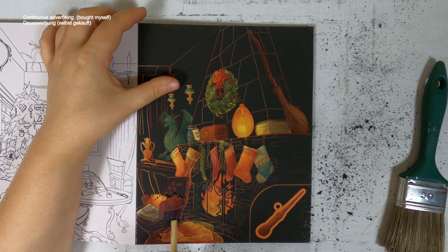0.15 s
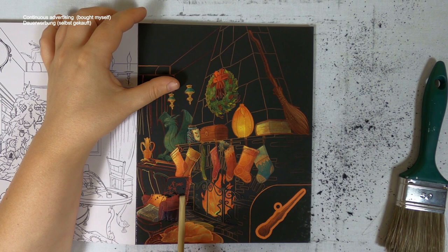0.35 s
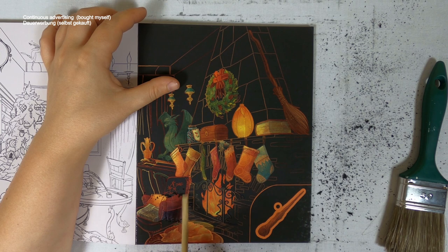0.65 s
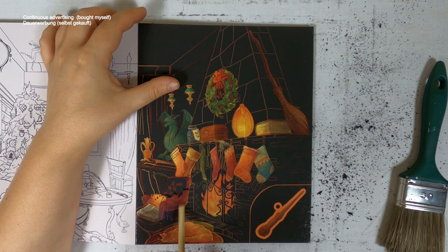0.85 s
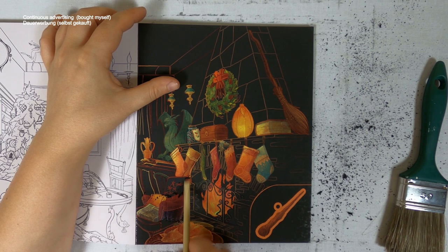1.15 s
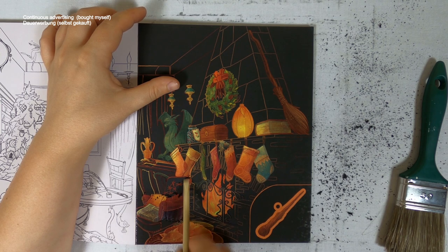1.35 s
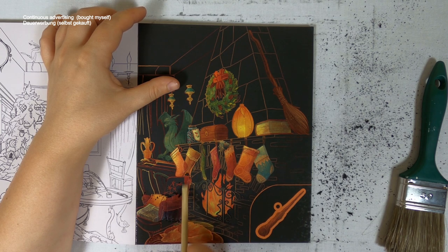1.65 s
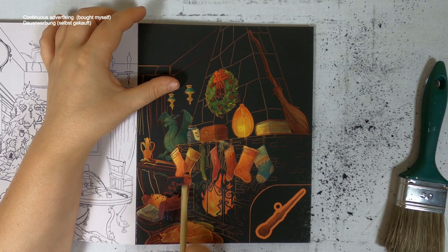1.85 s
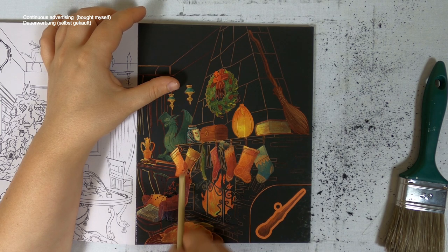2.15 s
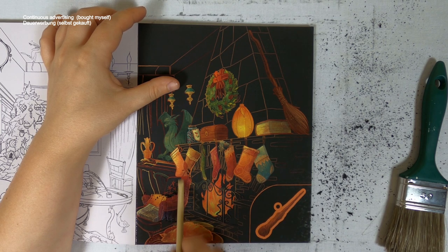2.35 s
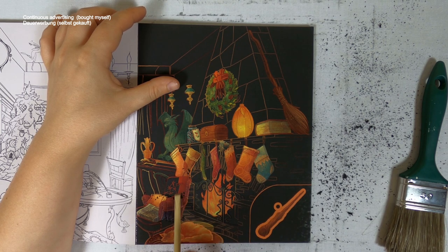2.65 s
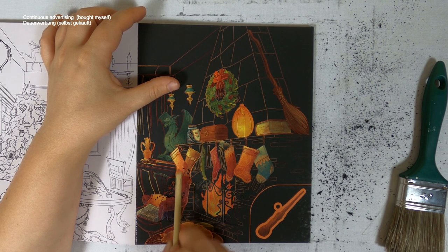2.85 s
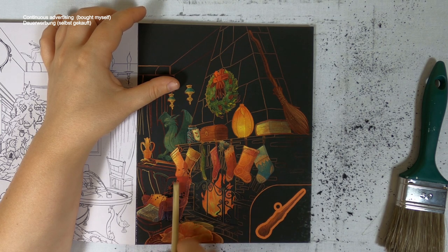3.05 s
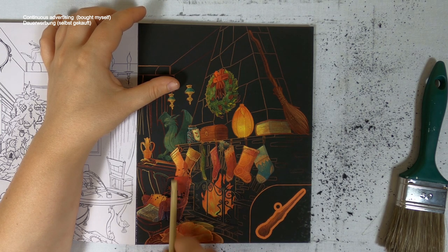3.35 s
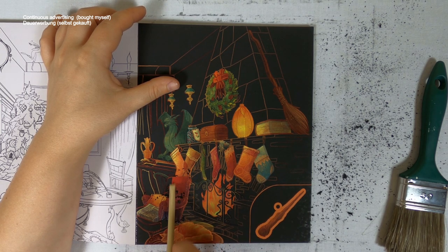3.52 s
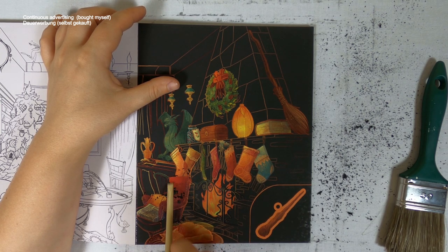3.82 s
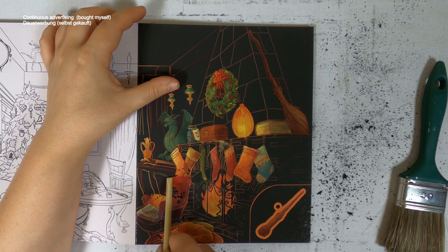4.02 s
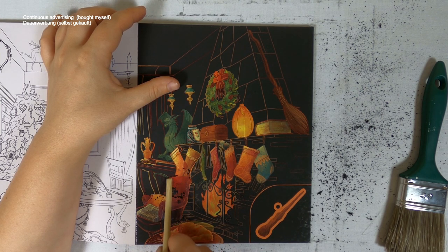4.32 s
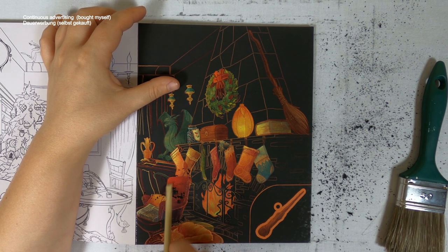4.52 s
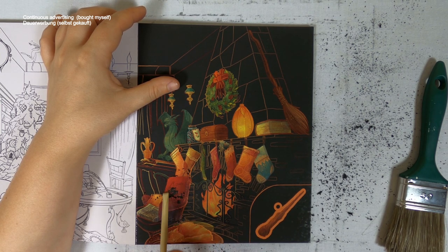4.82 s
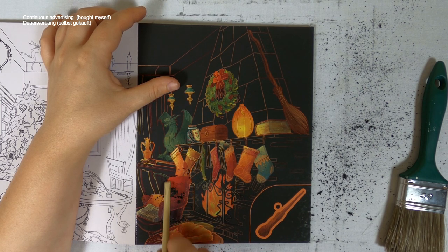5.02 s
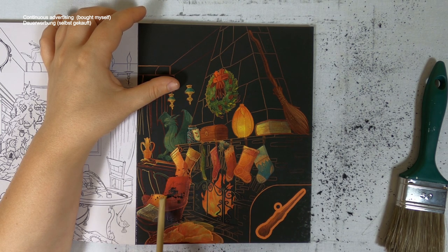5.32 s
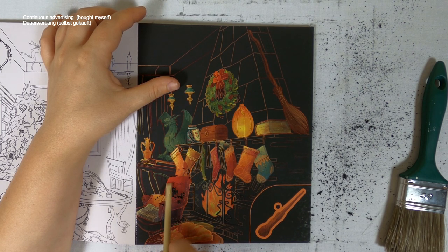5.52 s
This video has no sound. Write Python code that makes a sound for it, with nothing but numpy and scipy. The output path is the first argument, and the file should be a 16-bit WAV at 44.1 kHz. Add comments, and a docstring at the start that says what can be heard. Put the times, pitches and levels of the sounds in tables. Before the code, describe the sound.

In a quiet room, a pointed wooden stylus scrapes rapidly back and forth on coated scratch paper, heard closely in stereo. It starts abruptly at 0 s with a firm catch and the clearest soft table bump. Short strokes follow every 0.05 to 0.2 s, unevenly accented, each a grainy stick-slip chatter around 600-1000 Hz, often gliding down. Brief woody chirps stand out near 0.35, 1.1, 2.45, 2.65 and 2.8 s. Crisp hiss of crumbling coating is strongest in the first 0.8 s; small flakes snap around 0.3, 2.1-2.5 and 5.55 s. From 2.6 to 3.9 s the scraping is dense and steady. After about 3.2 s pitch is lower, and from 4 to 5.5 s strokes are softer and more spaced, with one last catch and flakes near 5.55 s. Faint low table shaking, occasional dull bumps, short reverberation and barely audible room noise lie underneath.

```python
"""Quick to-and-fro scraping: a pointed wooden stylus on a sheet of scratch paper on a table, in a quiet room.
Strokes and catches: stick-slip grains and gliding chirps ring the board; most strokes fall in pitch.
The coating crumbles as coloured grain noise, and flakes snap off as short noise bursts.
The hand shakes, rocks and bumps the table (low filtered noise, damped sines).
A short reverberation and faint steady room noise surround it."""
import sys
import numpy as np
from scipy import signal
from scipy.fft import rfft, irfft, next_fast_len
from scipy.io import wavfile
from scipy.ndimage import uniform_filter1d, map_coordinates

SR = 44100
rng = np.random.default_rng(int(sys.argv[2]) if len(sys.argv) > 2 else 0)


def dump(signal):
    """Clip the signal to [-1, 1] and save it as 16-bit WAV at the path in sys.argv[1]."""
    limited = np.clip(np.atleast_2d(signal).T, -1, 1)
    pcm = np.round(limited * 32767).astype(np.int16)
    wavfile.write(sys.argv[1], SR, pcm)


N = 250047


def amp(db):
    """Decibels to gain."""
    return 10 ** (np.asarray(db) / 20)


def unit(x):
    """x at rms 1."""
    return x / np.sqrt(np.mean(x ** 2) + 1e-20)


def along(points, hz):
    """(frequency [Hz], value) points read on a log axis."""
    f, v = np.transpose(points)
    return np.interp(np.log(hz + 1), np.log(f + 1), v)


def at_time(points, s):
    """(time [s], value) points joined by straight lines."""
    return np.interp(s, *np.transpose(points))


def wobble(rate_hz):
    """Smooth random curve with rate_hz knots a second."""
    knots = rng.standard_normal(int(N * rate_hz / SR) + 4)
    return map_coordinates(knots, [np.arange(N) * rate_hz / SR])


def filtered(x, response):
    """x times a response of frequency."""
    size = next_fast_len(N + SR // 2)
    return irfft(rfft(x, size) * response(np.fft.rfftfreq(size, 1 / SR)), size)[..., :N]


def ringing(x, gain_db, size=16384):
    """x through a causal minimum-phase filter with the given dB response, so that its peaks ring on."""
    cepstrum = irfft(np.log(amp(gain_db(np.fft.rfftfreq(size, 1 / SR)))))
    cepstrum[1:size // 2] *= 2
    cepstrum[size // 2 + 1:] = 0
    impulse = irfft(np.exp(rfft(cepstrum)))
    return signal.fftconvolve(x, impulse[None], axes=1)[:, :N]


def stereo(pair, alike):
    """Two unrelated signals mixed to left and right with a given coherence."""
    def mid_side(hz):
        turn = np.arccos(np.clip(along(alike, hz), -1, 1)) / 2
        return np.array([np.cos(turn), np.sin(turn)])
    mid, side = filtered(pair, mid_side)
    return np.array([mid + side, mid - side])


# tip strokes: (time of full grip [s], rise [s], drag [s], level [dB], pitch fall [octaves])
STROKES = [(0.0, .03, 0.0087, -37.5, 0.39), (0.151, 0.066, 0.026, -43.5, 0.018),
           (0.29, .021, 0.035, -38.5, 0.21), (0.345, 0.042, 0.031, -32.5, 1.06),
           (0.535, 0.022, 0.018, -44.5, 0.96), (0.69, 0.11, 0.041, -49.5, 0),
           (0.752, .014, 0.0088, -35, 1.25), (0.869, 0.051, .01, -47.5, 0.15),
           (1.039, 0.064, 0.034, -54, 0.22), (1.093, 0.017, 0.042, -35.5, 0.96),
           (1.223, 0.029, 0.07, -61, 0), (1.403, 0.065, 0.047, -52.5, 0.25), (1.458, .04, .014, -36, 0.68),
           (1.571, 0.013, 0.061, -39, 0.087), (1.7, .02, .03, -63.5, 0), (1.76, 0.084, 0.037, -52, 0.45),
           (1.923, 0.036, 0.04, -43, 1.13), (2.095, 0.084, .03, -44.5, 0),
           (2.255, .014, 0.069, -34.5, 1.18), (2.417, .018, 0.052, -38, 0.13), (2.56, 0.039, .03, -60, 0),
           (2.606, 0.011, .02, -35.5, 0.071), (2.645, .025, 0.022, -35.5, 0.42),
           (2.781, 0.017, .028, -40.5, 0.21), (2.83, .027, .012, -39.5, 0.62),
           (2.977, 0.017, 0.056, -37.5, 1.1), (3.117, 0.022, 0.0062, -41.5, 0.64),
           (3.165, 0.026, 0.024, -39, 0.8), (3.283, 0.055, 0.041, -38.5, 0.44),
           (3.463, 0.065, 0.0081, -46.5, 0.3), (3.552, 0.021, 0.067, -41.5, 0.23),
           (3.751, .032, 0.017, -40.5, 0.11), (3.863, 0.037, 0.051, -40, 0.51),
           (4.022, .074, 0.028, -57, 0), (4.16, 0.057, 0.047, -41, 0.35), (4.3, 0.058, 0.046, -58, 0.19),
           (4.455, 0.064, 0.055, -45.5, 0.17), (4.576, .025, 0.073, -59, 0), (4.815, .026, 0.09, -42, 0.49),
           (5.013, 0.039, 0.03, -44, 0.51), (5.075, .024, .02, -43, 0.57), (5.28, 0.067, .04, -64, 0),
           (5.338, 0.043, 0.045, -44.5, 0.3), (5.555, 0.044, 0.031, -43, 0.066)]
# tip catches in the coating: (time [s], level [dB], chirp pitch 7 ms in [Hz])
CATCHES = [(0.0, -24, 725), (0.258, -30, 683), (0.341, -22, 625), (0.711, -30, 1150), (0.763, -30.5, 725),
           (0.874, -29, 533), (1.091, -25, 1042), (1.109, -26.5, 737), (1.464, -28.5, 775),
           (2.073, -25.5, 950), (2.097, -27, 1155), (2.254, -34, 1050), (2.268, -24.5, 720),
           (2.443, -20.5, 765), (2.655, -22.5, 813), (2.797, -21, 783), (2.99, -24.5, 700),
           (3.163, -25.5, 637), (3.462, -31.5, 727), (3.748, -27, 709), (4.171, -25.5, 617),
           (5.376, -30, 690), (5.546, -27.5, 778)]
# pace of the hand, as stroke start pitch: (time [s], pitch [Hz])
PACE = [(0, 753), (0.6, 888), (1.1, 925), (1.5, 773), (2.1, 1017), (2.97, 1033), (3.15, 740), (3.9, 634),
        (4.5, 623), (5.6, 667)]
RELEASE_S = .07  # time to fall 30 dB
# a catch also tightens the grip: level re the catch, rise, hold, release, delay
CATCH_GRIP_DB, CATCH_RISE_S, CATCH_HOLD_S, CATCH_RELEASE_S = -13.5, .008, 0.00709, .03
CATCH_GRIP_DELAY_S = 0.002027


def grips():
    """Strokes and catches as (time s, rise s, drag s, release s, level dB, pitch Hz, fall octaves)."""
    strokes = [(s, rise, drag, RELEASE_S, db, at_time(PACE, s), fall)
               for s, rise, drag, db, fall in STROKES]
    caught = [(s + CATCH_GRIP_DELAY_S, CATCH_RISE_S, CATCH_HOLD_S, CATCH_RELEASE_S,
               db + CATCH_GRIP_DB, at_time(PACE, s), 0) for s, db, _ in CATCHES]
    return strokes + caught


def slips(pitch, rate, spread, cycles, scatter_db):
    """Irregular stick-slip grains, each a few cycles near the momentary pitch; rms 1."""
    count = max(int(rate * len(pitch) / SR), 1)
    at = ((np.arange(count) + rng.random(count)) * (len(pitch) - 1) / count).astype(int)
    detune, strength, sign = rng.standard_normal((count, 3)).T
    hz = pitch[at] * np.exp(spread * detune)
    lag = np.arange(SR // 50)
    turns = hz[:, None] * lag / SR
    grains = turns / cycles * np.exp(-turns / cycles) * np.sin(2 * np.pi * turns)
    grains *= (np.sign(sign) * amp(scatter_db * strength) * np.sqrt(hz))[:, None]
    positions = (at[:, None] + lag).ravel()
    return unit(np.bincount(positions, grains.ravel(), len(pitch))[:len(pitch)])


# fresh coating hisses most: (time [s], hiss re chatter for a medium stroke, before colouring [dB])
COATING = [(0, -14), (0.55, -11), (0.8, -17.5), (2.25, -18.5), (2.8, -21.5), (3.7, -22.5), (4.8, -20.5),
           (5.6, -20.5)]
MEDIUM_DB, HISS_LAG = -40.5, 0.2  # medium stroke; dB of hiss lost per dB of harder chatter
EASE_DB = 1  # drop across the drag
RUB_DB, RUB_RELEASE_S = -16.5, 0.2  # light rub after the drag: level re stroke, time to fall 30 dB
SHED_DELAY_S = 0.0011  # loosening to leaving the sheet


def stylus():
    """Stick-slip chatter of the tip, its force on the sheet, and its strength of shedding coating."""
    chatter, force, shedding = np.zeros((3, N))
    for s, rise, drag, release, db, hz, fall in grips():
        span = slice(max(int((s - 2 * rise) * SR), 0), min(int((s + drag + 3 * release) * SR), N))
        t = np.arange(N)[span] / SR - s
        early, late = np.maximum(-t, 0), np.maximum(t - drag, 0)
        release_db = np.maximum(-30 * late / release, RUB_DB - 30 * late / RUB_RELEASE_S)
        fade_db = -30 * early / rise + release_db
        ease_db = np.interp(t, [0, drag], [EASE_DB / 2, -EASE_DB / 2])
        level = amp(db + ease_db + fade_db)
        pitch = hz * 2 ** np.interp(t, [0, drag + release / 2], [0, -fall])
        # slips near the gliding pitch, with shorter, higher ones above
        glide = slips(pitch * .88, rate=700, spread=0.16, cycles=0.93, scatter_db=2.5)
        grit = slips(pitch * 1.4, rate=1500, spread=0.24, cycles=0.63, scatter_db=3.5)
        # chatter needs grip: it fades slightly sooner than the hiss
        chatter[span] += level * amp(0.022 * fade_db) * (amp(-2.5) * glide + amp(-5.5) * grit)
        force[span] += level ** 2
        # a faster tip chatters higher and sheds more
        hiss_db = at_time(COATING, s) - HISS_LAG * (db - MEDIUM_DB)
        shedding[span] += (level * amp(hiss_db) * (pitch / 800) ** .6) ** 2
    clock = np.arange(N) / SR
    shed_power = np.interp(clock - SHED_DELAY_S, clock, shedding)
    return chatter, np.sqrt(force), np.sqrt(shed_power)


def catches():
    """Each catch is a brief run of regular slips whose pitch drops as the tip is braked."""
    chirps, t = np.zeros(N + SR), np.arange(SR // 25) / SR
    swell = t / 0.0037
    envelope = swell * np.exp(1 - swell)
    for s, db, hz in CATCHES:
        jitter = uniform_filter1d(rng.standard_normal(len(t)), size=64) * np.sqrt(64)
        pitch = hz * np.exp(-16 * (t - .007) + 0.067 * jitter)
        phase = 2 * np.pi * np.cumsum(pitch) / SR
        chirps[round(s * SR):][:len(t)] += amp(db - 6.5) * envelope * np.sin(phase)
    return chirps[:N]


# board under the sheet, broad response: (frequency [Hz], relative gain [dB])
BOARD = [(120, -9.5), (250, 2), (450, -1.5), (530, -7.5), (650, 1.5), (1000, 0), (1300, 7), (1450, -4.5),
         (1900, -8), (2300, -11.5), (4000, -11)]
# board resonances added to it: (frequency [Hz], width [Hz], gain [dB])
BOARD_MODES = [(329.5, 44, 12), (393.6, 6.7, 6.5), (478, 51, 5), (631, 42, 3.5), (741.6, 48, 8),
               (837, 17, 4.5), (946, 26, 3.5), (1090, 19, 2), (1169, 21, 4.5), (1251, 29, 4.5),
               (1480, 9.4, 11.5), (1630, 15, 9.5), (1980, 16, -1)]


def board(drive):
    """Dispersive bending waves ring the board's resonances; the right channel leads slightly."""
    travel_s, lead_s = .004, 2.8e-5  # travel at 1 kHz

    def dispersion(hz):
        # bending waves travel slower at low pitch: delay re 1 kHz = travel * (sqrt(1000 / hz) - 1)
        return np.exp(-2j * np.pi * travel_s * (2 * np.sqrt(1000 * hz) - hz))

    def gain_db(hz):
        peaks = sum(db / (1 + (2 * (hz - centre) / width) ** 2) for centre, width, db in BOARD_MODES)
        return along(BOARD, hz) + peaks

    sound = amp(-3.5) * ringing(filtered(drive, dispersion)[None], gain_db)
    return filtered(sound, lambda hz: np.exp(1j * np.pi * hz * lead_s * np.array([[-1], [1]])))


def ripple(hz, spacing_hz):
    """The sheet's many small resonances: a random curve over frequency."""
    return map_coordinates(rng.standard_normal(int(SR / spacing_hz)), [hz / spacing_hz])


# likeness of left and right hiss: (frequency [Hz], coherence [0-1])
HISS_ALIKE = [(1000, 0.71), (2400, 0.62), (4500, 0.69), (8000, 0.22), (13000, 0.2)]


def sheet(crumbs, spectrum):
    """Crumbs coloured by the sheet, whose resonances shift as the tip changes place."""
    place = 1.48 * wobble(6)

    def colour(hz):
        # drawn afresh for each of the two places
        return along(spectrum, hz) + 3.76 * ripple(hz, spacing_hz=91.2) + 1.26 * ripple(hz, spacing_hz=568)

    return sum(ringing(stereo(crumbs() * share, HISS_ALIKE), colour)
               for share in (np.cos(place), np.sin(place)))


# hard scraping tears the coating: (frequency [Hz], relative density [dB per Hz])
RASP = [(500, -14), (1100, -8.5), (1950, 4), (2240, -6.5), (2900, 1), (3650, 1), (4020, -5.5), (4850, -6),
        (5400, -14), (7600, -14.5), (9100, -13.5), (10100, -19.5), (12000, -20.5), (15500, -41)]
# light rubbing only whispers: (frequency [Hz], relative density [dB per Hz])
WHISPER = [(800, -15.5), (1600, 9), (2000, 1.5), (2300, -9), (2950, -11), (3300, 2), (3580, 0),
           (4000, -9.5), (4700, -7.5), (5400, -11.5), (7600, -15), (8500, -10.5), (9300, -9),
           (10100, -21.5), (12000, -19), (15500, -37)]
# fresh coating tears under a light touch, a scraped patch needs more: (time [s], shedding threshold [dB])
TEARING = [(0, -69.5), (2.9, -67.5), (3.6, -57.5), (5.2, -52), (5.6, -59)]
# fine fizz set by the tip's angle: (time [s], level [dB])
FIZZ = [(0, -2), (0.4, -5), (1.2, 0), (1.6, -0.5), (2.3, 2), (3.0, 4.5), (3.8, -0.5), (4.8, -2.5),
        (5.6, -0.5)]


def coating(shedding):
    """The coating crumbles in dense, uneven grains: whisper when light, rasp when hard; flakes snap."""
    clock = np.arange(N) / SR
    # smoothed over 14 ms, and shed in clumps
    flow = np.abs(uniform_filter1d(shedding, size=SR // 70)) * amp(1.66 * wobble(220))

    def grain():
        return unit(amp(5.7 * wobble(2500)) * rng.standard_normal((2, N)))

    # power share that tears rather than rubs
    hard = 1 - 1 / (1 + (shedding / amp(at_time(TEARING, clock))) ** 4)
    hiss = amp(8.5) * sheet(lambda: flow * np.sqrt(hard) * grain(), RASP)
    hiss += amp(9.0) * sheet(lambda: flow * np.sqrt(1 - hard) * grain(), WHISPER)
    fizz = filtered(hiss, lambda hz: hz ** 6 / (hz ** 6 + 5500 ** 6))
    hiss += fizz * (amp(at_time(FIZZ, clock)) - 1)

    def flake_db(hz):
        return along(RASP, hz) + along([(4500, -0.5), (13000, -1.5)], hz)

    hiss += amp(1.0) * ringing(stereo(flakes(), HISS_ALIKE), flake_db)

    def lean_gain(hz):
        # upper middle leans left, highest fizz right
        lean_db = along([(1000, -4.5), (2200, 2.5), (5000, 1.8), (8500, 0.0), (12000, -2.2)], hz)
        return amp(np.array([lean_db, -lean_db]) / 2)

    return filtered(hiss, lean_gain)


# low modes of the table: (frequency [Hz], width [Hz], relative level [dB])
TABLE_MODES = [(76, 41, -13), (147, 13, 5), (169.9, 26, 4), (255.7, 15, 3.5), (327.7, 21, 2)]


def table(force):
    """The pressing hand shakes the table's low modes as band-filtered noise, and sometimes bumps it."""
    def modes(f):
        return sum(amp(db) * (1j * f * w / (c * c - f * f + 1j * f * w)) ** 2 for c, w, db in TABLE_MODES)

    push = amp(-40) * unit(force) ** .5 + amp(-44.5 + 2.7 * wobble(10))
    shake = filtered(push * rng.standard_normal((2, N)), modes)
    return amp(-6.5) * stereo(shake, [(30, 0.56), (150, 0.46), (330, 0.88)]) + thuds()


# base level, growth with pace, random swing
SWAY_DB, SWAY_DB_PER_OCTAVE, SWAY_SWING_DB = -76, 5.5, 5.5


def sway():
    """The whole table rocks near 33 Hz, more when the arm moves quickly."""
    noise = filtered(rng.standard_normal((2, N)), lambda hz: 1 / (1 + ((hz - 33) / 11) ** 2))
    octaves = np.log2(at_time(PACE, np.arange(N) / SR))
    pace_db = SWAY_DB_PER_OCTAVE * (octaves - octaves.mean())
    level_db = SWAY_DB + pace_db + SWAY_SWING_DB * wobble(5.9)
    return amp(level_db) * unit(stereo(noise, [(33, 0.89)]))


# still room noise: (frequency [Hz], relative density [dB per Hz])
AIR = [(15, -59), (25, 2), (66, -39), (133, -32), (240, 5), (919, -9.5), (1300, -8), (1750, -15),
       (2360, -15), (2630, -17), (2920, -20), (6730, -24), (15500, -30.5)]


def air():
    """Faint steady room noise: shaped Gaussian noise, nearly unrelated left and right."""
    noise = filtered(rng.standard_normal((2, N)), lambda hz: amp(along(AIR, hz)))
    return amp(-68.5) * unit(stereo(noise, [(50, 0.22), (1000, 0.087), (4000, 0.062), (10000, 0.12)]))


# reverberation: (frequency [Hz], t60 [s])
ROOM = [(150, 0.054), (1000, 0.28), (4000, 0.31), (12000, 0.39)]


def room(x):
    """The walls answer 3.3 ms later as decaying noise, each frequency dying at its own speed."""
    hz, t, z = signal.stft(rng.standard_normal((2, SR // 2)), SR, nperseg=256)
    decay = amp(-60 * t / along(ROOM, hz)[:, None])
    tail = signal.istft(z * decay, SR, nperseg=256)[1]
    tail = np.pad(tail / np.linalg.norm(tail[0]), ((0, 0), (SR // 300, 0)))
    return signal.fftconvolve(x, tail, axes=1)[:, :N]


# hand bumps the table: (time [s], level [dB])
BUMPS = [(0.007, -33), (0.363, -50), (1.473, -51), (2.31, -44), (2.469, -54), (3.484, -44.5), (5.382, -49)]
# table top under a soft bump: (frequency [Hz], relative level [dB], t60 [s])
THUD = [(73, -16, 0.21), (140.3, -4.5, 0.23), (169.5, -12.5, 0.2), (251.5, -12, 0.19), (333, -5, 0.18)]


def thuds():
    """A soft bump of the hand rings the table top briefly: damped sines with a slow onset."""
    out, t = np.zeros(N + SR), np.arange(SR // 3) / SR
    onset = 1 - np.exp(-t / 0.0088)
    for s, db in BUMPS:
        ring = sum(amp(level + rng.normal(0, 2.8) - 60 * t / t60) * np.sin(2 * np.pi * hz * t)
                   for hz, level, t60 in THUD)
        out[round(s * SR):][:len(t)] += amp(db) * ring * onset
    return out[:N]


# flakes that snap off: (time [s], relative level [dB])
FLAKES = [(0.3216, -35), (0.363, -46), (0.8824, -48), (1.4581, -48), (1.48, -48), (2.101, -32),
          (2.284, -31), (2.465, -30), (2.804, -40), (2.847, -37.5), (3.1948, -39), (3.3465, -45),
          (3.774, -46), (5.5482, -35.5), (5.5778, -34.5)]


def flakes():
    """Each flake breaks with a sharp noise crack, and its crumbs follow as a weaker, slower decay."""
    cracks, t = np.zeros((2, N + SR)), np.arange(SR // 40) / SR
    fade = amp(-60 * t / 0.014) + amp(-7.0 - 60 * t / 0.034)
    for s, db in FLAKES:
        burst = fade * rng.standard_normal((2, len(t)))
        cracks[:, round(s * SR):][:, :len(t)] += amp(db - 5.0) * burst
    return cracks[:, :N]


def scene():
    """Board, coating and table sound together in the room."""
    chatter, force, shedding = stylus()
    scrape = board(chatter + catches()) + coating(shedding)
    return scrape + amp(-12) * room(scrape) + table(force) + sway() + air()


TOP_HZ = 15700


def record(dry):
    """Nothing is kept above the band limit."""
    return filtered(dry, lambda hz: hz < TOP_HZ)


dry = scene()
out = record(dry)
dump(out)
```